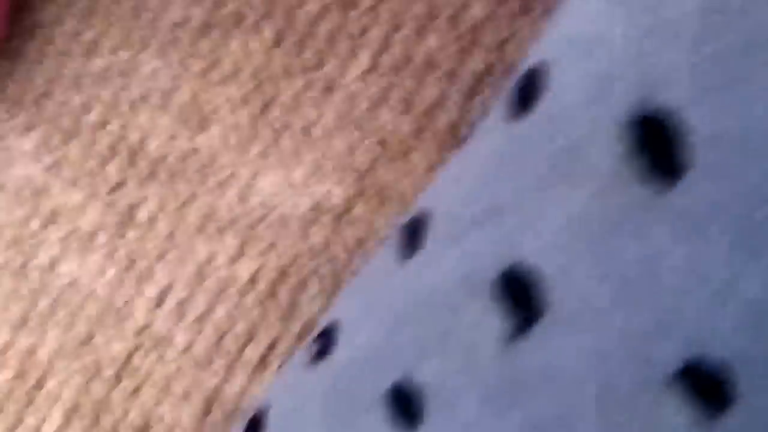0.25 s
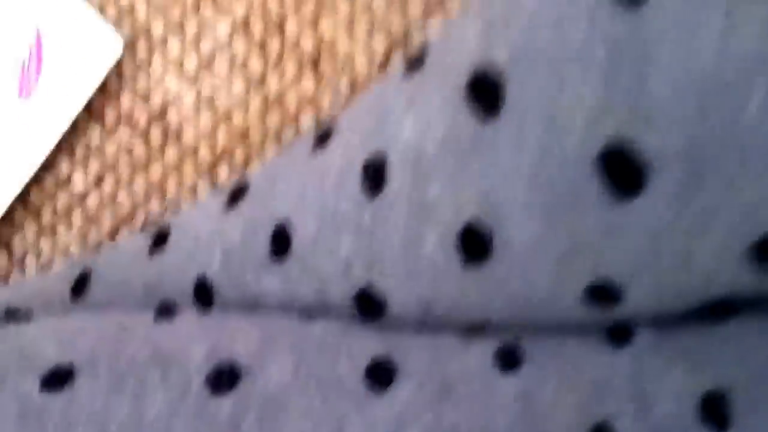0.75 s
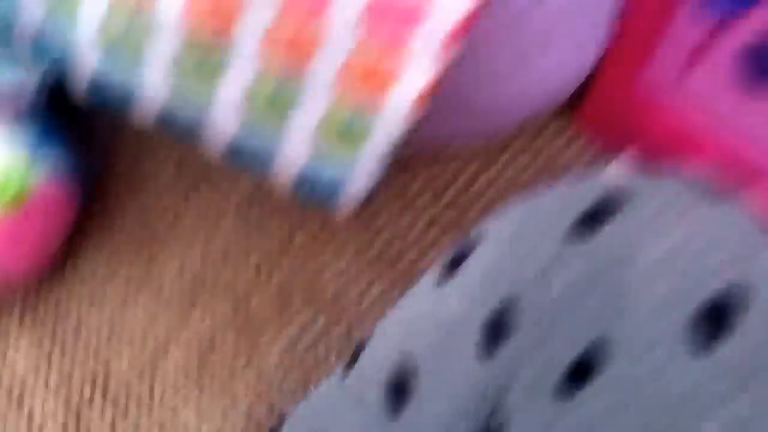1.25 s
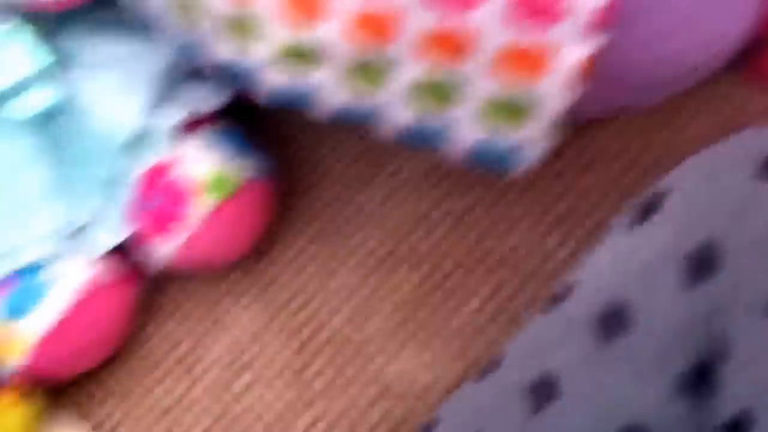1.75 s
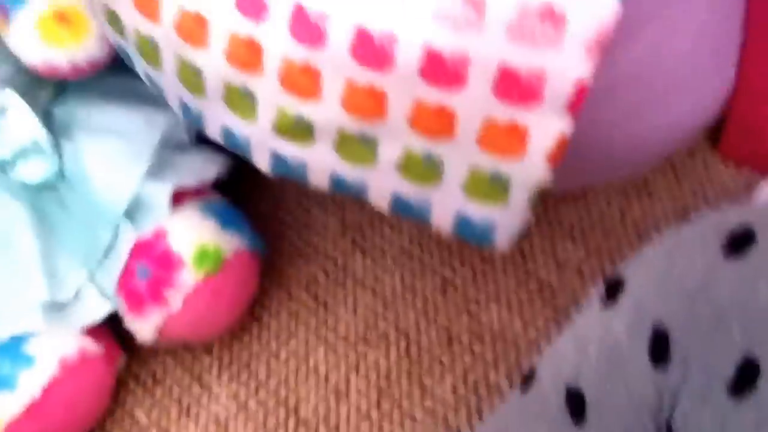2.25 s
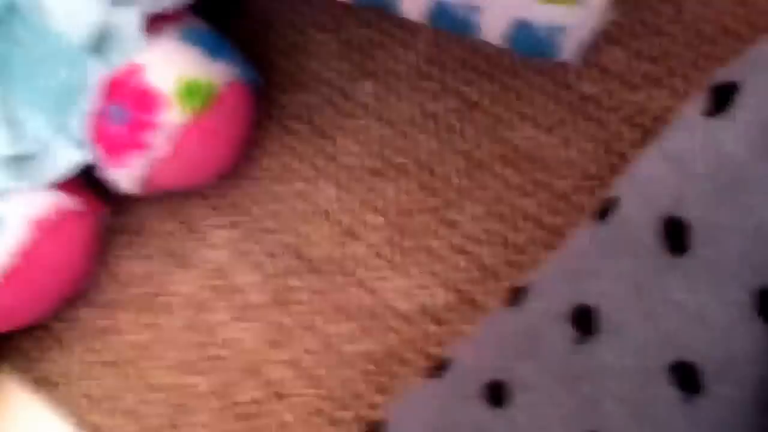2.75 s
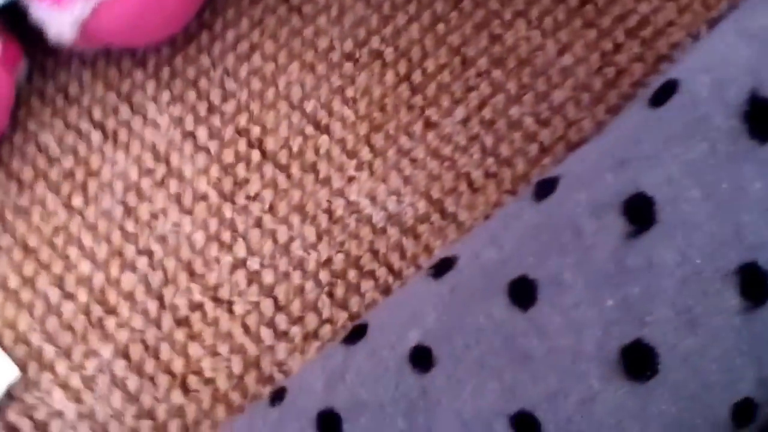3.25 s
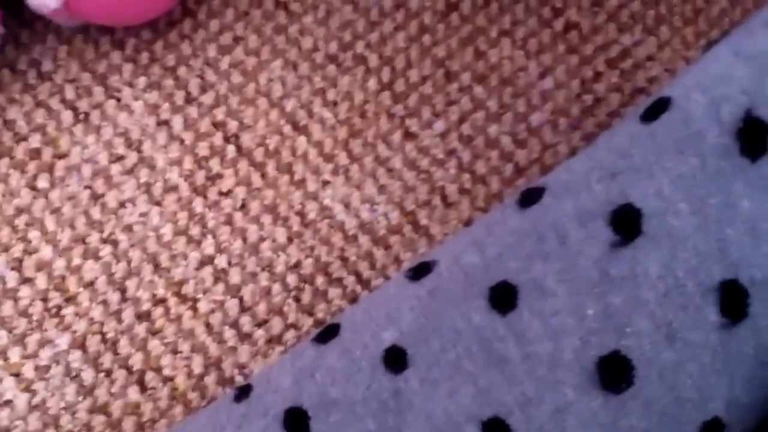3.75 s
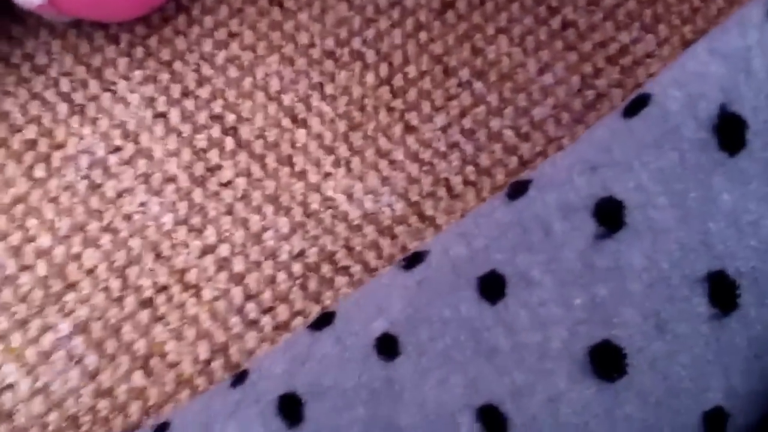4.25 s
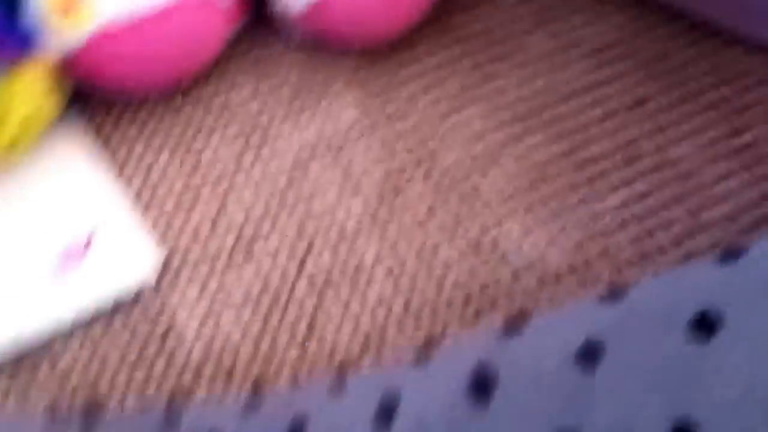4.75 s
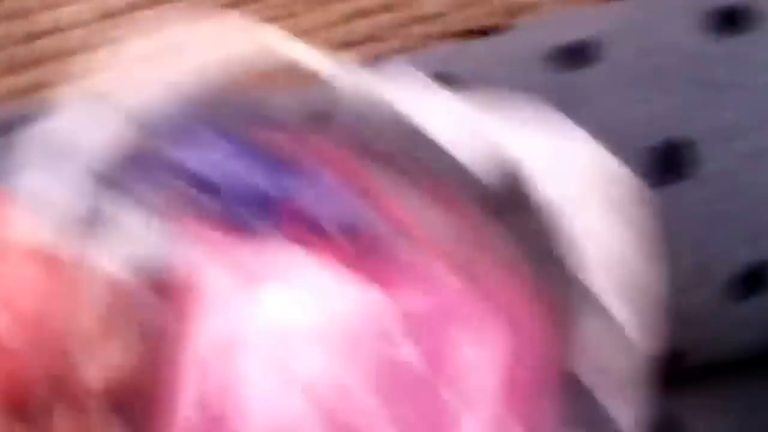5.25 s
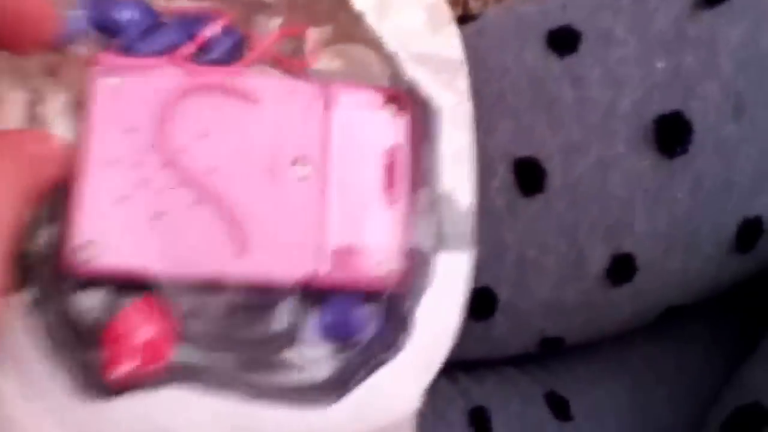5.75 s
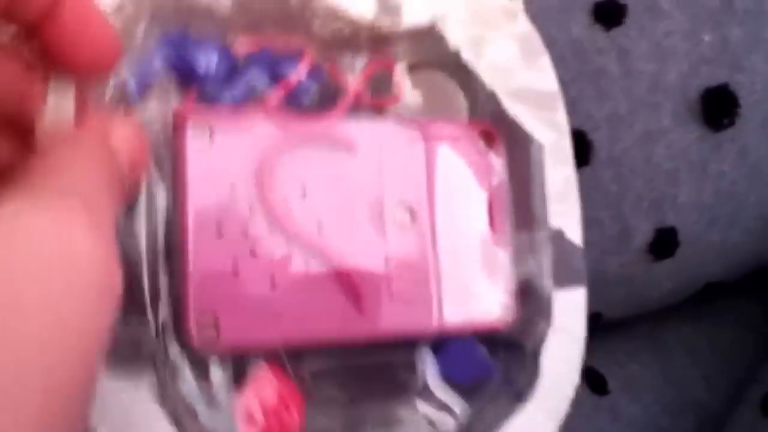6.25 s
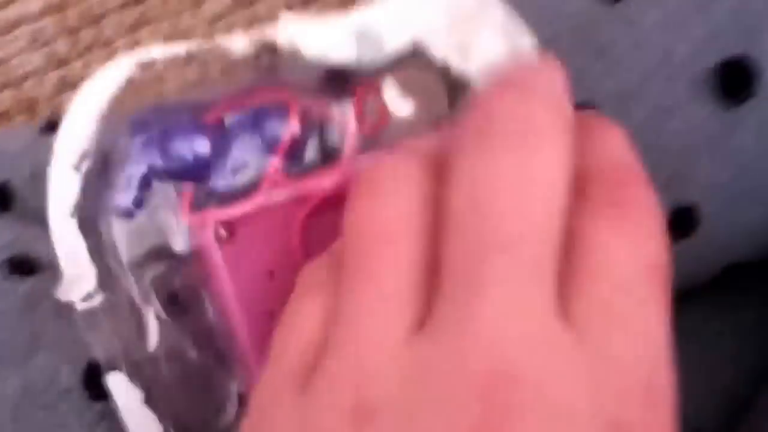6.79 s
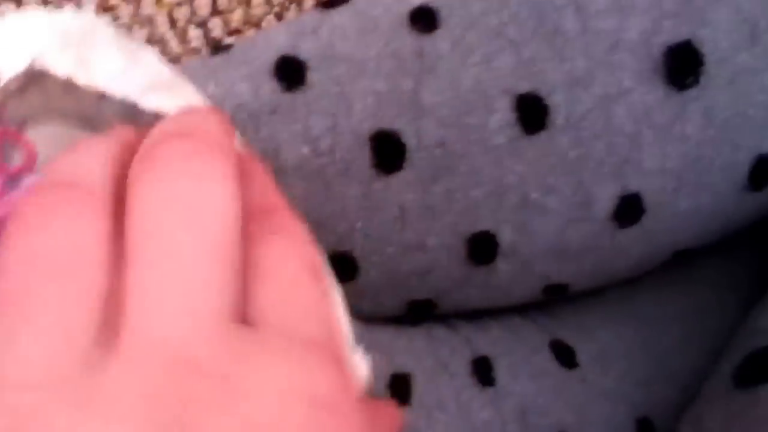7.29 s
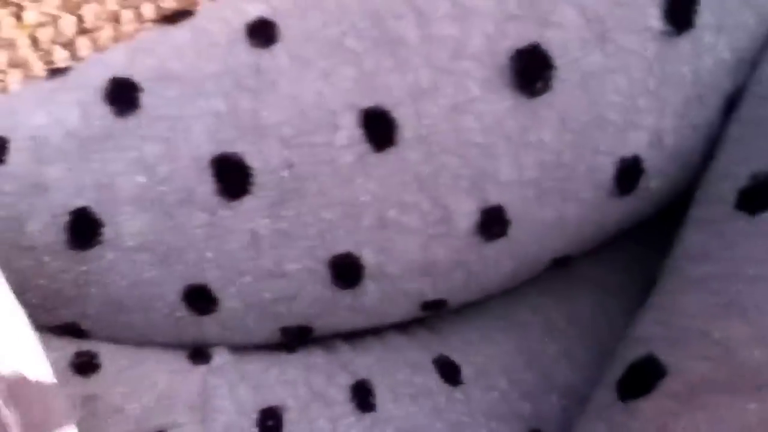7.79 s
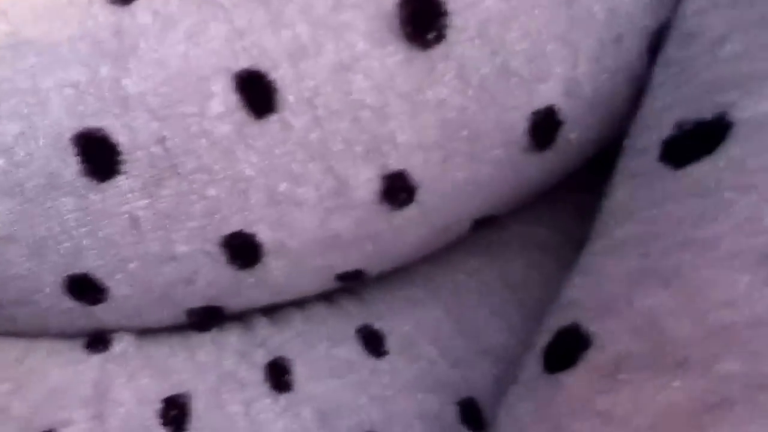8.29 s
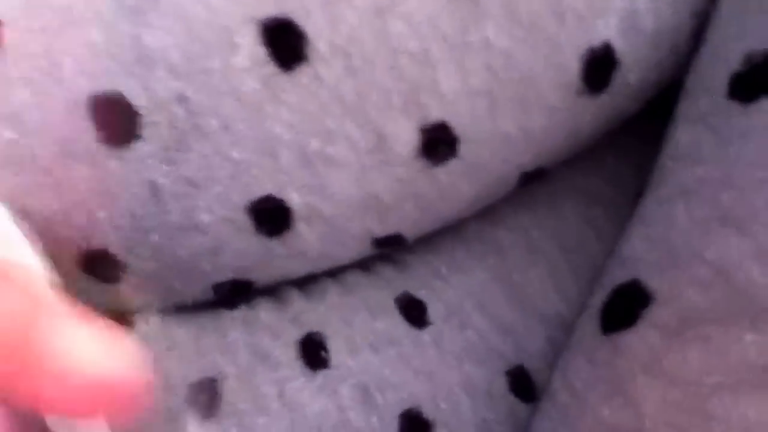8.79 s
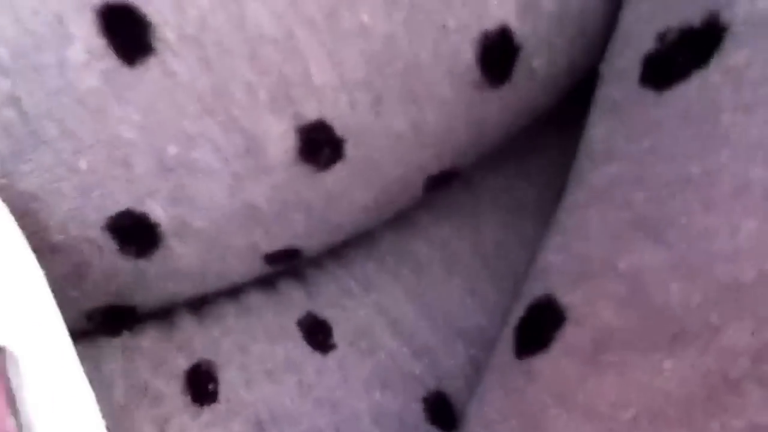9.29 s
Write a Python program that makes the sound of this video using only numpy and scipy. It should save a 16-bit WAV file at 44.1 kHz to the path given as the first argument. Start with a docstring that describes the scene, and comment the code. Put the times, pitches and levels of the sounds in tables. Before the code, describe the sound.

Hands crumple and pull stiff paper and card: gritty snaps, small hollow pops and hissing rustle come in uneven bursts, with low thumps as the grip shifts on the microphone. The middle is quieter and sparse. Near the end a tight edge creaks, tears crisply, and crumples again. Dry, close, faint room hush.

```python
"""Creases in stiff wrapping and card snap one by one, as gritty noise bursts with a short facet ring.
Hands crumple, pull and tear it close to a small microphone in a quiet carpeted room.
Facets pop as pitched swings; the sheet rustles as a spray of tiny buckles on sliding hiss.
A taut edge creaks in nearly even slips before the rip; the holder's hand thumps the microphone.
Shaped noise makes the room's hush."""
import sys
import numpy as np
from scipy import signal
from scipy.fft import rfft, irfft
from scipy.io import wavfile
from scipy.ndimage import uniform_filter1d

SR = 44100
rng = np.random.default_rng(int(sys.argv[2]) if len(sys.argv) > 2 else 0)


def generate_wav(sig):
    """Save sig (samples, or channels by samples) to the path in sys.argv[1] as 16-bit PCM at SR."""
    pcm = np.round(np.clip(np.atleast_2d(sig).T, -1, 1) * 32767).astype(np.int16)
    wavfile.write(sys.argv[1], SR, pcm)


N = 420273

# Creases that buckle. Each row: start in seconds, level in dB before the common SNAP_TRIM_DB,
# brightness in dB, 60 dB fade time in ms (200 at most), time to the fade in ms, facet pitch in Hz.
CREASE_SNAPS = [(.01, -33.5, -12.5, 39, 2.4, 1290), (.0429, -31.5, -10, 19, 1.25, 930),
                (0.0694, -34.5, -10, 56, 5.2, 1000), (0.1227, -31, -3.5, 9.9, 6.5, 3880),
                (0.1685, -20.5, -3, 82, 0.52, 840), (0.189, -30, -5, 16, 1.9, 3040),
                (.212, -29, -3, 25, 9.3, 3070), (0.2608, -23, -8, 40, 1, 870),
                (0.2794, -27.5, -14.5, 95, 2.7, 805), (0.2968, -26.5, -6.5, 170, 14, 840),
                (.361, -21, -3, 4.6, 1.36, 990), (0.491, -28, -3, 130, 5.7, 3870),
                (0.5102, -21.5, -6, 26, 3.7, 3550), (0.5209, -10.5, 0.5, 23, 0.74, 2010),
                (0.5265, -19, -6, 37, 6.8, 3650), (0.5304, -24, 7, 7.3, 0.92, 3630),
                (0.5404, -22.5, -5, 114, 12.5, 730), (0.5601, -24, 2, 32, 4.2, 3820),
                (0.6164, -15, -5, 7.2, 1.1, 2450), (0.6447, -12, 3, 6.6, .8, 6300),
                (0.649, -15, -4, 32, 2.9, 980), (.66, -21, 2, 11, 1.3, 5000),
                (0.692, -29, -5.5, 34, .6, 830), (0.702, -13.5, -0.5, 5.4, 1.1, 4670),
                (0.724, -25, -7, 71, 1.18, 960), (0.7326, -24, -13, 24, 8, 970),
                (0.7685, -17.5, -8, 25, 1.35, 800), (0.7736, -16, -1.5, 76, 5.6, 4420),
                (1.055, -24, -4, 110, 3.4, 3170), (1.09, -34, -17, 18, 1.5, 2600),
                (1.3683, -27, -4, 50, 2.4, 1030), (1.404, -29, -11, 18, 1, 1310),
                (1.4096, -28.5, -8.5, 160, 19, 1450), (1.51, -31.5, -9, 11, 0.96, 2040),
                (2.0025, -39, -18, 18, 0.42, 460), (2.0291, -16, -1.5, 21, 1.1, 690),
                (2.048, -39.5, -15, 110, 1.9, 1090), (2.7214, -31.5, -10, 23, 1.45, 1040),
                (2.7719, -32, -5, 31, 1.1, 630), (2.788, -32, -10, 20, 1.2, 1000),
                (2.873, -31.5, -3.5, 18, 1.3, 1840), (2.888, -32, -8, 29, 1.8, 1050),
                (2.909, -29, -10, 69, 1.5, 970), (2.926, -32, -6, 90, 6.9, 3060),
                (3.033, -34, 0, 8, .6, 3200), (3.0518, -13.5, 1.5, 12, 1.87, 4060),
                (3.0597, -29.5, -11, 7.3, 7.5, 910), (3.097, -29, 3.5, 13, 0.77, 900),
                (3.134, -32, 5, 15, 1, 3200), (3.229, -38, 17, 13, 1.5, 7500),
                (3.2409, -21, -1, 34, 6.6, 1090), (3.288, -19.5, -5, 33, 3.6, 1220),
                (3.324, -18.5, -3, 60, 1.47, 1090), (3.331, -15, -7.5, 40, 5.4, 3750),
                (3.393, -26, 5, 14, 1.5, 2800), (3.4317, -16.5, -6, 23, 2.3, 370),
                (3.444, -23, 8, 60, 2, 3600), (3.463, -1, -3.5, 15, 1.0, 3620),
                (3.473, -8.5, 2.5, 24, 1.18, 3970), (3.535, -35.5, -12, 56, 2.3, 1070),
                (3.557, -33, 1, 77, 1.5, 3740), (3.566, -31.5, -5.5, 43, 12.6, 800),
                (3.6396, -34.5, 8, 13, 1.2, 1940), (3.672, -32, -5, 96, 4.1, 1060),
                (3.7245, -39, -17.5, 56, 1.5, 500), (3.7586, -23.5, 0.5, 30, 4.1, 1710),
                (3.8077, -35, 13, 15, 1, 3000), (3.823, -30, -5, 31, 7.9, 786),
                (3.8736, -23.5, -1.5, 24, 6.1, 2630), (3.887, -32.5, 5.5, 27, 17, 3580),
                (3.9351, -26.5, -8.5, 31, 4.1, 378), (4.1018, -36.5, -9, 34, 1.8, 2900),
                (4.416, -34, -8.5, 62, 11.6, 1790), (4.5398, -40, -12, 34, 0.87, 450),
                (4.799, -37, -3, 7.1, 1.1, 2830), (4.902, -37.5, 1, 5.4, .7, 5770),
                (4.98, -44, 3, 6, .7, 5000), (5.0294, -31, 4, 13, 0.45, 3000),
                (5.085, -26, -6, 24, 4.5, 3650), (5.388, -37, -8, 81, 3.7, 4100),
                (5.4078, -29.5, -4, 13, 7.8, 2840), (5.6265, -32.5, -11.5, 61, 2.3, 1870),
                (5.668, -36.5, 9, 6.8, 2, 3780), (5.8582, -34.5, -9.5, 33, 4.6, 1450),
                (5.8872, -31.5, -9, 25, 2.55, 990), (5.965, -34.5, -3, 26, 2.3, 1740),
                (6.0295, -35.5, 5, 5, 1.2, 8200), (6.141, -39.5, -8.5, 20, 16, 1910),
                (6.346, -34, -6, 120, 8.4, 1790), (6.4199, -34, 0, 85, 4.9, 2280),
                (6.461, -26.5, -0.5, 24, 1.1, 3480), (6.651, -12, -8, 36, 3.5, 2550),
                (6.759, -40, -1, 210, 8.1, 1780), (6.9521, -30, -4, 26, 0.47, 1310),
                (6.9931, -33, -2, 150, 11, 2000), (7.0097, -30.5, -3, 58, 26, 1810),
                (6.969, -34, -7, 27, 0.76, 1400), (7.088, -37.5, -5, 32, 2.1, 3630),
                (7.147, -42.5, -18, 19, 1.7, 1750), (7.3347, -33.5, 1.5, 31, 0.85, 2370),
                (7.4854, -28, 17.5, 15, 0.27, 3700), (7.5872, -32, -0.5, 130, 1.8, 320),
                (7.603, -36, -1, 62, 7.9, 2290), (7.679, -37, 2, 22, 1.2, 2280),
                (7.7639, -27.5, 0, 17, 1.03, 1130), (7.8, -40, 8, 20, 2.6, 3000),
                (7.839, -34, 7, 7.1, 1.6, 8550), (7.9519, -24, 6.5, 8.4, 2.1, 4040),
                (8.0306, -21.5, 9, 7.2, 1, 11000), (8.036, -29.5, -8, 19, 1.8, 1960),
                (8.0628, -25, 3, 36, 1.6, 7710), (8.084, -30.5, 11, 13, 4.7, 7580),
                (8.1364, -37, 6, 60, 1.2, 6900), (8.147, -29, 16, 57, 1.2, 9000),
                (8.168, -25, 16, 33, 1.2, 9600), (8.156, -26, 12, 6.3, 2.2, 2980),
                (8.172, -9, -0.5, 6, 0.79, 4600), (8.1757, -9, 0.5, 12, 6.5, 4600),
                (8.2102, -5.5, 3.5, 11.4, .6, 4890), (8.2928, -20, -5.5, 22, 0.6, 1140),
                (8.404, -40, -2, 40, 25, 1150), (8.456, -27, 10, 9.3, 1, 9550), (8.466, -37, 9, 4, 1, 4560),
                (8.551, -37, 11, 220, 1.6, 5400), (8.5637, -13, 11, 3.2, 1.52, 5150),
                (8.587, -19.5, 4, 11, 9.8, 4460), (8.6327, -37.5, -8, 143, 2.4, 2010),
                (8.742, -37, 16.5, 6.6, 0.89, 8800), (8.836, -17, 0.5, 59, 10, 1920),
                (8.845, -13.5, 8.5, 26, 5.1, 2060), (8.849, -18.5, -15, 25, 3.54, 351),
                (8.8727, -28.5, -3, 26, 2.9, 920), (9.0707, -50, -20.5, 16, 2.6, 880),
                (9.151, -33, 2, 110, 9.2, 3750), (9.164, -19.5, 2, 39, 5.2, 2800),
                (9.219, -18, -1.5, 32, 8.9, 1200), (9.245, -42, -15.5, 35, 2.4, 1280)]
# Flat facets that flex. Each row: start in seconds, peak of the pure tone in dB, pitch in Hz, swell in ms.
FACET_POPS = [(.275, -37, 343, 8.8), (1.366, -23.5, 1040, 1.5), (1.387, -31, 372, 4.9),
              (1.425, -35, 648, 11), (1.445, -35, 406, 7.6), (3.433, -25.5, 373, 7),
              (3.877, -20, 2890, 0.91), (6.12, -45, 915, 1.1), (6.152, -26.5, 1310, 1.8),
              (6.181, -35, 1310, 1.2), (7.586, -38, 323, 3.4), (7.608, -40.5, 287, 6),
              (7.612, -36.5, 620, 5.1), (8.182, -16, 1020, 1.25)]
# Pulls and squeezes of the sheet. Each row: loudest moment in seconds, level in dB, build-up in ms,
# fade in ms (20 dB gained or lost in each of these times), brightness in dB.
SHEET_MOVES = [(0, -44.5, 50, 64, -16.5), (.115, -44, 23, 52, -9), (.205, -43, 59, 24, -12),
               (0.309, -44.5, 170, 480, -12.5), (.374, -45.5, 99, 68, 12), (.55, -39.5, 98, 68, 7),
               (.625, -34.5, 55, 62, 3), (.72, -42, 81, 55, -6), (.783, -32.5, 140, 60, -4),
               (.9, -47, 310, 110, -15.5), (1.0, -43.5, 57, 530, -13), (1.068, -40.5, 160, 55, 2.5),
               (1.35, -37, 103, 210, 0), (1.407, -38.5, 150, 150, 13.5), (1.43, -38, 130, 92, -19),
               (1.57, -40.5, 180, 125, -5.5), (1.808, -50.5, 220, 170, -3), (1.99, -44.5, 16, 380, -14.5),
               (2.12, -39, 150, 56, 9), (2.23, -55, 370, 10, -16), (2.35, -40, 70, 174, -5),
               (2.469, -43.5, 580, 89, -0.5), (2.763, -41.5, 49, 710, -10), (3.15, -41, 160, 300, 1),
               (3.273, -37.5, 120, 200, -7.5), (3.478, -29, 118, 43, -8.5), (3.667, -46.5, 180, 120, -11),
               (3.785, -34.5, 100, 50, -5.5), (3.906, -45, 31, 130, -7.5), (3.97, -53, 60, 180, -8),
               (4.02, -39, 95, 26, -6), (4.1, -53.5, 60, 55, -12), (4.19, -41, 25, 62, -5.5),
               (4.3, -40, 105, 99, -6), (4.36, -43, 330, 15, -8), (4.79, -58, 350, 320, -6),
               (5.068, -50.5, 86, 170, -6), (5.483, -49.5, 370, 93, -6), (5.637, -45.5, 52, 79, -9.5),
               (5.827, -45.5, 250, 130, -4.5), (5.986, -44, 36, 56, 4), (6.146, -51.5, 82, 100, -12),
               (6.297, -44, 123, 110, 0), (6.665, -46, 21, 110, -7), (6.805, -42, 120, 33, -1.5),
               (6.93, -58, 220, 180, 3), (7.02, -41.5, 120, 58, 1), (7.32, -50.5, 140, 270, -8),
               (7.413, -44.5, 31, 39, -3.5), (7.53, -47.5, 390, 550, -5.5), (7.623, -47.5, 140, 30, 3),
               (7.72, -51, 340, 150, -4), (7.89, -43, 170, 130, -4.5), (7.97, -43, 180, 190, 10),
               (8.031, -43, 13, 140, 18.5), (8.085, -42, 140, 100, 19.5), (8.14, -39, 40, 82, 18.5),
               (8.174, -37.5, 150, 90, -5), (8.311, -57, 20, 150, -9), (8.397, -47.5, 31, 87, -4.5),
               (8.607, -34, 85, 60, 1.5), (8.845, -50.5, 150, 450, -3.5), (9.015, -48, 84, 35, -4),
               (9.118, -54.5, 22, 44, -18), (9.169, -31.5, 13, 86, 3), (9.215, -28.5, 46, 23, 0.5),
               (9.345, -49.5, 470, 56, 2.5), (9.528, -53.5, 70, 100, -9)]
# The sheet slides or parts evenly, with little catching. Each row: start in seconds, end in seconds.
EVEN_SLIDES = [(1.15, 1.95), (2.08, 2.16), (2.26, 2.6), (2.74, 3.2), (4.16, 4.39), (6.99, 7.05),
               (7.81, 8.13), (9.15, 9.24)]
# Fingers scrape over the stiff pack. Each row: start in seconds, end in seconds.
PACK_SCRAPES = [(4.16, 4.39), (6.755, 6.82), (6.99, 7.05)]
# Rings the pack lends the rustle. Each row: pitch in Hz, width in Hz, relative level in dB.
PACK_RINGS = [(1830, 160, 6), (2600, 220, 0), (3160, 270, 6)]
# A taut edge creeps. Each row: start in seconds, end in seconds.
CREAK_SPANS = [(7.81, 8.01)]
# Rings of the taut edge. Each row: pitch in Hz, width in Hz, relative level in dB.
EDGE_RINGS = [(4460, 830, 0), (9100, 1300, 0.5)]
# Gain of the paper's treble. Each row: time in seconds, gain in dB.
TREBLE_GAIN = [(0, 6.5), (1.4, 6), (2.0, 1.5), (3.5, 1.5), (4.5, 6), (6.0, 5.5), (7.97, -4.5), (8.03, 3.5),
               (9.53, -4.5)]
# The grip on the microphone shifts. Each row: start in seconds, rumble in dB, rumble's 60 dB fade
# in seconds, thump in dB, thump pitch in Hz.
GRIP_SHIFTS = [(0, -28, 0.25, -25, 88), (0.056, -42, .2, -38, 86), (0.119, -42, 0.8, -39, 65),
               (.3, -42, 0.47, -36, 62), (1.381, -33, 0.14, -44, 80), (2.997, -45.5, .3, -40, 130),
               (3.029, -42.5, 0.65, -41, 78), (3.069, -53, .3, -37, 70), (3.11, -48, .3, -41, 84),
               (4.38, -53, .2, -45, 62), (4.873, -39, 0.21, -36.5, 66)]
# Spectrum of the hush. Each row: frequency in Hz, relative density in dB.
HUSH_SPECTRUM = [(15, -44), (25, 1), (134, 13.5), (270, 10), (545, -0.5), (2690, -7.5), (10400, -6.5),
                 (14800, -12), (16000, -32)]
# The hush sinks after the rip and creeps back. Each row: time in seconds, gain in dB.
HUSH_GAIN = [(0, -1.5), (8.2, -2), (8.23, -30), (8.6, -7.5), (9.53, -5)]

# body and crisp level against the middle band, at brightness 0
SNAP_BODY_DB, SNAP_CRISP_DB, SHEET_BODY_DB, SHEET_CRISP_DB = -8.5, -5.5, -11.5, -9
BODY_THINS = 2.26   # bright snaps lose body this many times faster than they gain crispness
SNAP_TRIM_DB, SNAP_LEN = -8.5, 4096   # samples
POP_ROUGHNESS, POP_LEN = 0.4, 4096   # samples
MEDIAN_BUCKLES_PER_S, BUCKLE_SPREAD_DB, BUCKLE_DECAY_MS = 700, 7, 1.7
BUCKLE_RMS_DB = -0.5   # before sliding and patches weigh it
CREAK_SLIPS_PER_S, CREAK_UNEVENNESS, CREAK_RMS_DB = 84, 0.13, -46.5
TREBLE_HZ = 9000
THUMP_T60_S, STEADY_RUMBLE_DB = 0.15, -67.5
HUSH_RMS_DB = -53   # before HUSH_GAIN
STOPBAND_HZ = 16700


def snaps():
    """Each crease lets go as a gritty burst that swells and dies; the facet beside it rings briefly."""
    out, t = np.zeros(N + SNAP_LEN), np.arange(SNAP_LEN) / SR
    noise = rng.standard_normal((len(CREASE_SNAPS), 2, SNAP_LEN))
    for row, (white, grit) in zip(CREASE_SNAPS, noise):
        start_s, level_db, bright_db, t60_ms, swell_ms, facet_hz = row
        swell_s = np.clip(swell_ms, .05, 30) / 1000
        t60_s = np.clip(t60_ms / 1000, .002, .2)
        rise = np.minimum(0.76 + 0.44 * t / swell_s, 1) ** 2.2
        fade = from_db(-60 * np.maximum(t - swell_s, 0) / t60_s)
        # fibres give way unevenly, in clumps
        fine_db = 20.7 * uniform_filter1d(grit, size=16)
        clump_db = 22.8 * uniform_filter1d(grit[::-1], size=90)
        burst = white * rise * fade * from_db(fine_db + clump_db)
        burst[int(swell_s * SR)] += 4.5   # the crease flips over
        burst = burst + 2.66 * resonance(burst, facet_hz, 0.13 * facet_hz)

        bands = three_bands(burst)
        head = int((swell_s + 0.00039) * SR)   # bands are balanced over the loud head
        body, middle, crisp = [b / (np.sqrt(np.mean(b[:head] ** 2)) + 1e-9) for b in bands]
        body_db = SNAP_BODY_DB - max(bright_db, BODY_THINS * bright_db)
        mix = body * from_db(body_db) + middle + crisp * from_db(SNAP_CRISP_DB + bright_db)
        at = int(start_s * SR)
        out[at:at + SNAP_LEN] += from_db(level_db + SNAP_TRIM_DB) * mix
    return out[:N]


def pops():
    """A facet swings at its own pitch, swelling and dying within a few cycles, a little unsteady."""
    out, t = np.zeros(N + POP_LEN), np.arange(POP_LEN) / SR
    noise = rng.standard_normal((len(FACET_POPS), POP_LEN))
    for (start_s, peak_db, hz, swell_ms), white in zip(FACET_POPS, noise):
        age = t / swell_ms * 1000   # in swell times
        unsteady = rms_one(resonance(white, hz, 0.12 * hz))
        swing = np.sin(2 * np.pi * hz * t) + POP_ROUGHNESS * unsteady
        at = int(start_s * SR)
        out[at:at + POP_LEN] += from_db(peak_db) * age * np.exp(1 - age) * swing
    return out[:N]


def tiny_buckles(catching):
    """Tiny buckles fire in clumps, each a click with a short puff of noise; sliding makes them quieter."""
    size_db = BUCKLE_SPREAD_DB * np.minimum(rng.exponential(1, N), 3.0)
    sizes = from_db(size_db) * rng.choice([-1, 1], N)
    born = rng.random(N) < MEDIAN_BUCKLES_PER_S * from_db(4.0 * drift(25)) / SR
    clicks = sizes * born
    puffs = decay(np.abs(clicks), BUCKLE_DECAY_MS / 1000) * rng.standard_normal(N)
    return from_db(BUCKLE_RMS_DB) * catching * rms_one(0.28 * puffs + clicks)


def rustle():
    """Buckles over the hiss of paper on paper; each patch of the sheet has a pitch and comes and goes."""
    catching = 1 - .75 * during(EVEN_SLIDES)
    buckles = tiny_buckles(catching)
    stick_slip = from_db(catching * (4.38 * drift(23.5) + 1.22 * drift(154)))
    white = rng.standard_normal((2, N))
    active_patch = 7 + 4.5 * drift(60)   # wanders over the patch numbers
    sheet = 0
    for k, hz in enumerate(np.geomspace(300, 14000, 14)):
        patch_gain = from_db(3.6 * np.sqrt(catching) * drift(8.0))
        hiss = 0.27 * white[k % 2] * stick_slip * patch_gain
        dealt = 0.5 * buckles * np.exp(-((active_patch - k) / 2.48) ** 2)
        sheet = sheet + resonance(hiss + dealt, hz, .2 * hz)
    body, middle, crisp = [rms_one(b) for b in three_bands(sheet)]
    ringing = rms_one(ring_bank(middle, PACK_RINGS))
    pack_share = .68 * during(PACK_SCRAPES)   # of the power
    middle = np.sqrt(1 - pack_share) * middle + np.sqrt(pack_share) * ringing
    return sum(gain * part for gain, part in zip(movement(), (body, middle, crisp)))


def movement():
    """Gains of the sheet's body, middle and crisp part: moves build up and fade; their powers add."""
    t = np.arange(0, N + 40, 40) / SR   # every 40th sample
    peak_s, peak_db, build_ms, fade_ms, bright_db = np.transpose(SHEET_MOVES)[:, :, None]
    away = np.maximum((peak_s - t) / build_ms, (t - peak_s) / fade_ms) * 1000
    level_db = peak_db - 20 * away
    gains = []
    for part_db in (SHEET_BODY_DB - bright_db, 0, SHEET_CRISP_DB + bright_db):
        total = np.sqrt(np.sum(from_db(level_db + part_db) ** 2, axis=0))
        gains.append(np.interp(np.arange(N) / SR, t, total))
    return gains


def creak():
    """A taut edge creeps in small slips at a nearly even pace; their puffs ring the stretched paper."""
    turns = np.cumsum(CREAK_SLIPS_PER_S * (1 + CREAK_UNEVENNESS * drift(40))) / SR
    slips = np.diff(np.floor(turns), prepend=0) * from_db(3.2 * drift(60))
    puffs = decay(slips, 0.002) * rng.standard_normal(N)
    return from_db(CREAK_RMS_DB) * rms_one(ring_bank(puffs, EDGE_RINGS)) * during(CREAK_SPANS)


def treble_shift(paper):
    """The paper's treble rises and falls: the part above a first-order lowpass gets a moving gain."""
    duller = signal.lfilter(*signal.butter(1, TREBLE_HZ, fs=SR), paper)
    return duller + from_db(in_time(TREBLE_GAIN)) * (paper - duller)


def handling():
    """Each shift of the grip thumps the case and leaves a dull rumble, over a faint steady one."""
    t, level, thumps = np.arange(N) / SR, from_db(STEADY_RUMBLE_DB), 0
    for start_s, rumble_db, t60_s, thump_db, hz in GRIP_SHIFTS:
        age_s = np.maximum(t - start_s, 0)
        level = level + np.minimum(age_s / 0.045, 1) * from_db(rumble_db - 60 * age_s / t60_s)
        thump_gain = from_db(thump_db - 60 * age_s / THUMP_T60_S)
        thumps = thumps + thump_gain * np.sin(2 * np.pi * hz * age_s)
    case = signal.butter(2, [45, 115], "band", fs=SR, output="sos")
    return thumps + level * rms_one(signal.sosfilt(case, rng.standard_normal(N)))


def room_hush():
    """Noise with the room's spectrum, under a drawn level curve with one steep drop."""
    noise = rms_one(coloured(rng.standard_normal(N), HUSH_SPECTRUM))
    return from_db(HUSH_RMS_DB + in_time(HUSH_GAIN)) * noise


def from_db(db):
    """Amplitude factor of a level in dB."""
    return 10 ** (np.asarray(db) / 20)


def rms_one(x):
    """Scales a signal to RMS 1."""
    return x / np.sqrt(np.mean(x ** 2) + 1e-20)


def in_time(rows):
    """(s, value) rows joined by straight lines, one value a sample."""
    s, values = np.transpose(rows)
    return np.interp(np.arange(N) / SR, s, values)


def during(spans):
    """1 inside the spans, 0 outside."""
    t = np.arange(N) / SR
    return sum((t > start) & (t < end) for start, end in spans)


def coloured(x, spectrum):
    """Gives a flat signal the slope of a (Hz, dB) table, straight over log frequency."""
    hz = np.maximum(np.arange(len(x) // 2 + 1) * SR / len(x), 1)
    point_hz, point_db = np.transpose(spectrum)
    gain_db = np.interp(np.log(hz), np.log(point_hz), point_db)
    return irfft(rfft(x) * from_db(gain_db), len(x))


def drift(rate_hz):
    """Slow chance at about the given rate, drawn at every 20th sample; RMS 1."""
    r = np.exp(-40 * np.pi * rate_hz / SR)
    white = rng.standard_normal(N // 20 + 2002)
    slow = signal.lfilter([1], [1, -2 * r, r * r], white)[2000:]   # start-up dropped
    return np.interp(np.arange(N) / 20, np.arange(len(slow)), rms_one(slow))


def decay(x, time_constant_s):
    """Lets each impulse die away exponentially."""
    return signal.lfilter([1], [1, -np.exp(-1 / (time_constant_s * SR))], x)


def resonance(x, hz, width_hz):
    """One broad ring, gain about 1 on top."""
    r = np.exp(-np.pi * width_hz / SR)
    feedback = [1, -2 * r * np.cos(2 * np.pi * hz / SR), r * r]
    return signal.lfilter([(1 - r * r) / 2, 0, (r * r - 1) / 2], feedback, x)


def ring_bank(x, rings):
    """Sum of parallel rings from (Hz, width Hz, dB) rows."""
    return sum(from_db(db) * resonance(x, hz, width_hz) for hz, width_hz, db in rings)


def three_bands(x):
    """Body, middle and crisp parts; a thin sheet radiates little bass and thins out at the top."""
    x = signal.sosfilt(signal.butter(1, [330, 7000], "band", fs=SR, output="sos"), x)
    edges_hz = [160, 1250], [1500, 6000], [6000, 16000]
    filters = [signal.butter(2, edges, "band", fs=SR, output="sos") for edges in edges_hz]
    body, middle, crisp = [signal.sosfilt(f, x) for f in filters]
    return body, -middle, crisp   # the flipped sign joins the bands without a notch


def scene():
    """Paper, the hand and the room's hush; carpet and cloth leave no audible tail."""
    paper = treble_shift(snaps() + pops() + rustle() + creak())
    return (paper + handling() + room_hush())[None]


def record(dry):
    """Peaks are rounded, then the top is cut, 80 dB down from STOPBAND_HZ."""
    rounded = 1.2 * np.tanh(dry / 1.2)
    return signal.sosfilt(signal.cheby2(16, 80, STOPBAND_HZ, fs=SR, output="sos"), rounded)


dry = scene()
out = record(dry)
generate_wav(out)
```